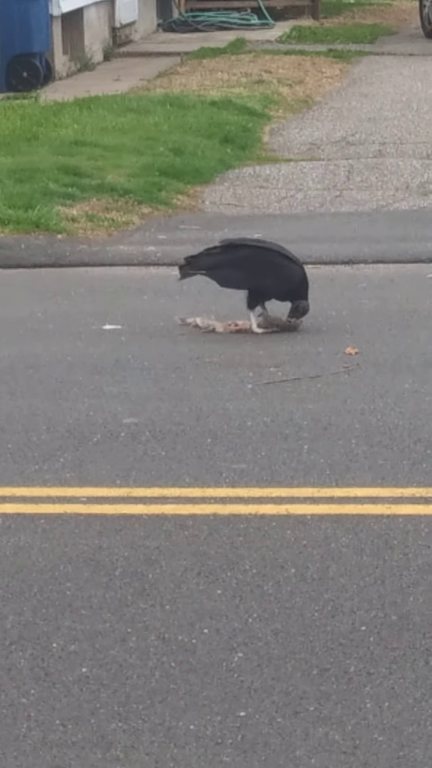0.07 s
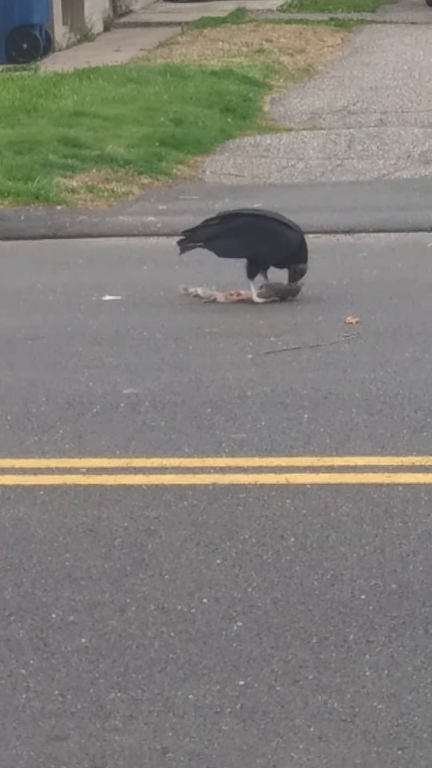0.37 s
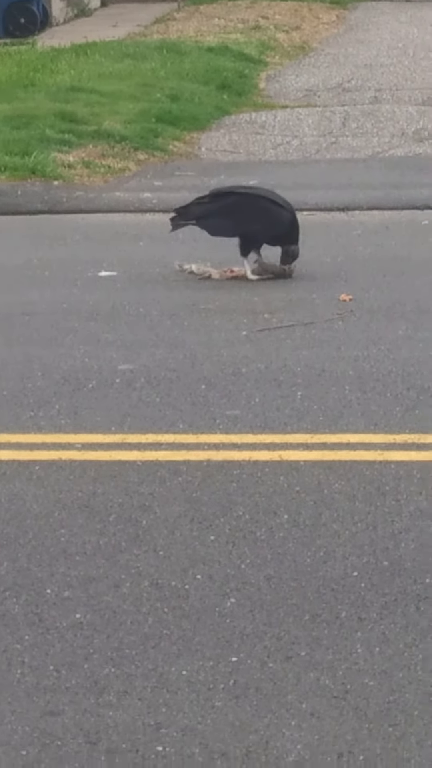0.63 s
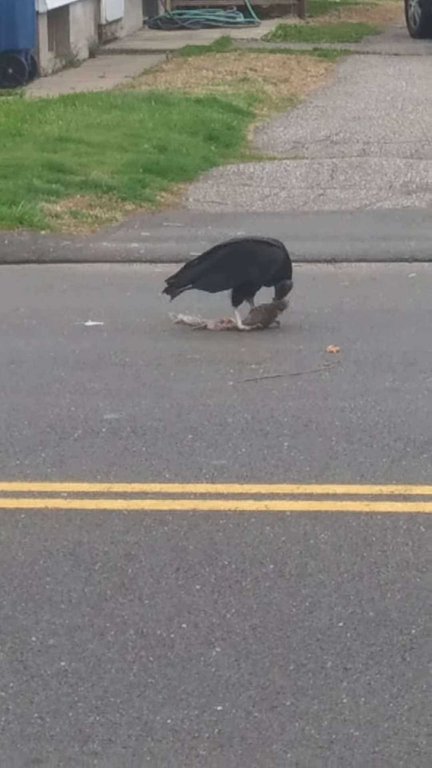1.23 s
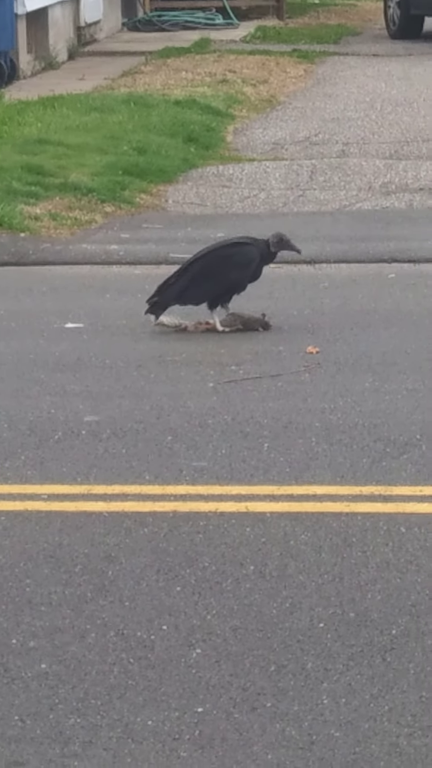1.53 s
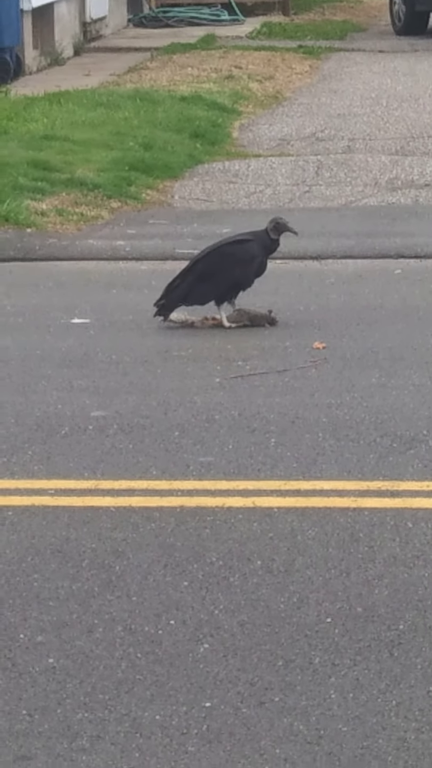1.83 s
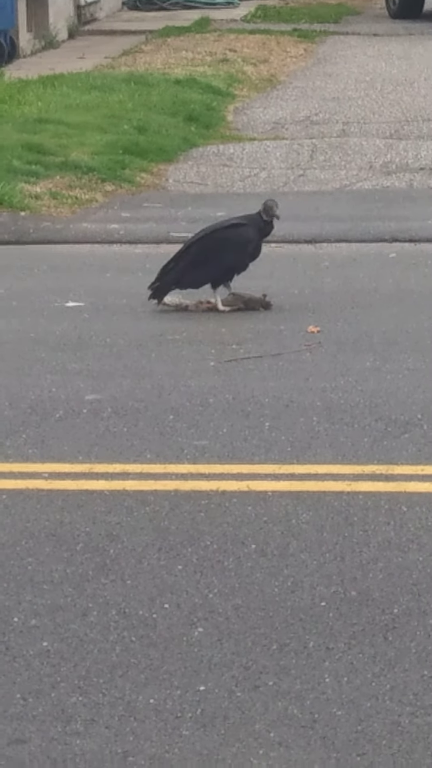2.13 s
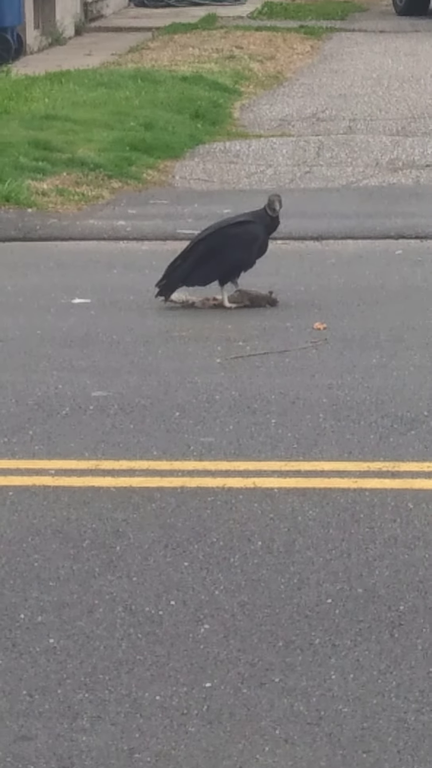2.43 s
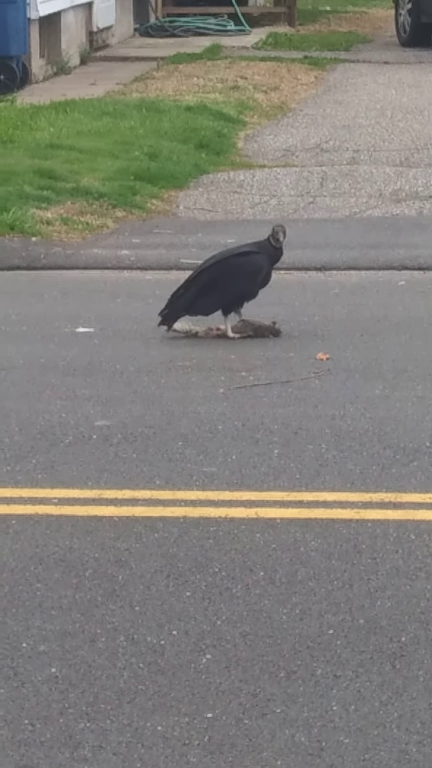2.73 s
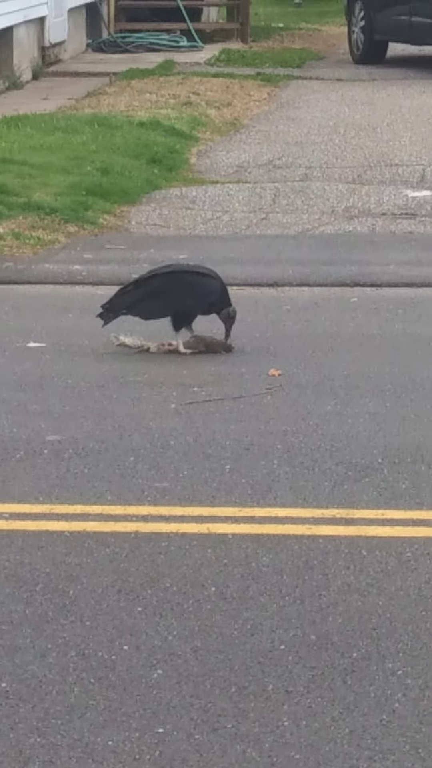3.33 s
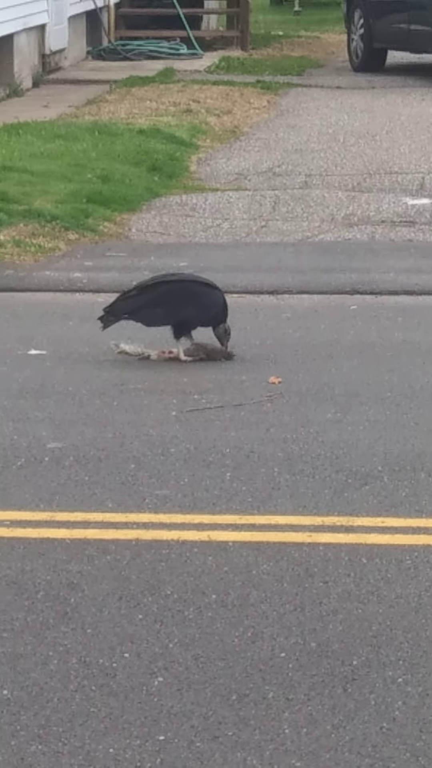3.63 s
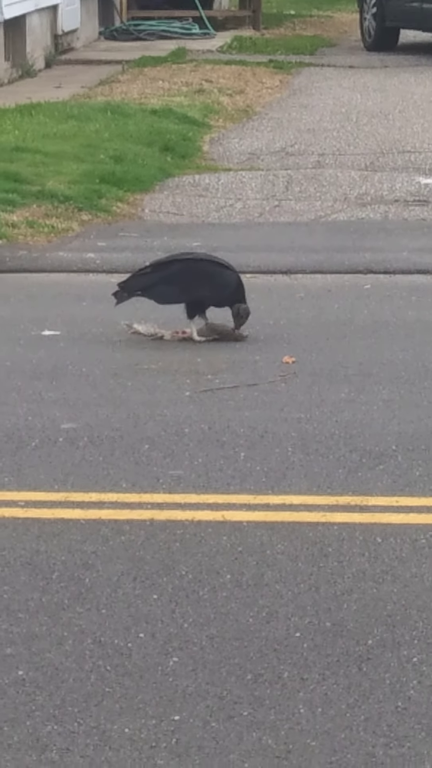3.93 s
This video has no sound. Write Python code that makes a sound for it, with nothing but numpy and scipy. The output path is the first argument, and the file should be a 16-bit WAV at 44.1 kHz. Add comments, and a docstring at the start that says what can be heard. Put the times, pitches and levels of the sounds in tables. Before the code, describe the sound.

Tyre noise from a far-off car gradually builds along a quiet suburban road. Faint birds whistle, chatter and rasp. Up close come one hollow clack early on, light dry ticks and soft finger bumps on the camera.

```python
"""The tyre noise of a far car slowly swells over a low rumble on a quiet suburban street.
Up close, fingers bump and creak on a hand-held camera's case, with faint dry ticks, and something hard
clacks once, its quick contacts ringing a hollow body. Small birds whistle, chatter and rasp far away.
Underneath lie a soft hiss and a very faint, blipping high whine."""
import sys
import numpy as np
from scipy import signal
from scipy.fft import rfft, irfft, next_fast_len
from scipy.io import wavfile
from scipy.ndimage import uniform_filter1d, map_coordinates

SR = 44100
rng = np.random.default_rng(int(sys.argv[2]) if len(sys.argv) > 2 else 0)


def file_out(sig):
    """Save sig as 16-bit WAV at sys.argv[1]."""
    # one column per channel
    cols = np.atleast_2d(sig).T
    # limit, then scale
    lim = np.clip(cols, -1, 1)
    pcm = np.round(lim * 32767).astype(np.int16)
    wavfile.write(sys.argv[1], SR, pcm)


N = 176400

# Table levels are relative; a colour is an EQ curve for noise.
# colour of the hiss bed: f/Hz, level/dB
HISS_COLOUR = [(25, -8), (1000, 11), (4000, 1), (6000, 3), (8000, 0.5), (10000, 2.5), (12000, -1),
               (15500, 1.5)]
# falling bird notes: t/s, length/s, start f/Hz, end f/Hz, level/dB
WHISTLE_NOTES = [(0.01, 0.07, 3990, 3960, -68.5), (0.405, 0.16, 5000, 4390, -66),
                 (.597, 0.12, 4740, 4450, -65.5), (1.485, 0.12, 5180, 4350, -62),
                 (1.655, 0.097, 5400, 4650, -65), (2.63, 0.055, 4330, 4130, -61),
                 (3.18, 0.112, 4430, 4330, -59)]
# colour of a bird's rattling chatter: f/Hz, level/dB
RATTLE_COLOUR = [(3000, -42), (3900, -4), (4500, 0), (4900, -2), (5500, -16), (6500, -48)]
# a bird's harsh calls: t/s, length/s, level/dB
RASP_CALLS = [(1.005, .21, -54.5), (1.315, .04, -60)]
# colour of the breath in those calls: f/Hz, level/dB
BREATH_COLOUR = [(2300, -32), (3100, -4), (3550, 1), (3850, -2), (4500, -10), (5800, -20), (6500, -24),
                 (7100, -15), (7500, -28), (8100, -21), (9500, -45)]
# patches of finger creak: centre t/s, half length/s, level/dB
CREAK_PATCHES = [(0.174, 0.084, -81), (0.78, 0.053, -65), (2.29, 0.091, -66), (2.97, 0.14, -74),
                 (3.235, 0.081, -61), (3.887, 0.041, -66)]
# colour of the friction grains: f/Hz, level/dB
CREAK_COLOUR = [(2000, -28), (4400, 11), (6000, 5), (9500, -4), (12000, -4), (15500, -25)]
# dry ticks: t/s, level/dB, centre f/Hz
TICK_HITS = [(.0912, -48, 9500), (.2384, -46.5, 5200), (.5312, -47.5, 10500), (.566, -36.5, 3400),
             (.603, -52, 7500), (.803, -55, 5460), (1.102, -35, 2900), (1.3843, -47, 10000),
             (1.764, -52.5, 7500), (1.9864, -43.5, 5800), (2.0692, -43.5, 7900), (2.1565, -49, 9000),
             (2.2488, -48, 6500), (2.2677, -51, 6000), (2.2812, -41, 5600), (2.86, -50, 7000),
             (2.996, -47, 8000), (3.2076, -41, 6500), (3.243, -46, 8450), (3.3692, -47, 7500),
             (3.3862, -40, 7950), (3.449, -50, 9000), (3.5808, -46, 8950), (3.66, -47.5, 7000),
             (3.7908, -49, 7000), (3.925, -45.5, 8500), (3.9804, -48, 7000)]
# finger bumps on the case: t/s, level/dB, f/Hz
FINGER_HITS = [(.125, -44, 190), (0.227, -41.5, 287), (0.239, -33.5, 337), (.253, -45, 249),
               (0.27, -42.5, 222), (0.299, -45, 200), (0.94, -40.5, 290), (1.282, -39, 293),
               (1.308, -47, 277), (1.433, -49, 260), (1.450, -45.5, 280), (1.489, -46, 250),
               (1.983, -36.5, 318), (1.989, -35.5, 357), (1.997, -37, 268), (2.344, -38.5, 262),
               (2.4971, -20.5, 385), (2.513, -32.5, 460), (2.667, -33.5, 292), (2.676, -33.5, 322),
               (2.690, -22, 626), (2.698, -24.5, 322), (2.709, -35, 250), (2.787, -29.5, 305),
               (2.562, -38.5, 194), (2.870, -35.5, 285), (2.902, -40, 260), (3.076, -40, 323),
               (3.302, -48, 198), (3.474, -29.5, 313), (3.659, -32, 290), (3.742, -31.5, 330),
               (3.755, -28.5, 328), (3.856, -27.5, 373), (3.87, -29.5, 387), (3.898, -29, 290)]
# contacts within the clack: t/s, level/dB
CLACK_HITS = [(0.8911, -20), (0.8934, -19.5), (0.8944, -19.5), (0.8997, -24.5), (0.9066, -34)]
# the clack's hollow low body and hard ring: f/Hz, level/dB, t60/s
CLACK_RING = [(297, -16, 0.045), (397, -8, 0.053), (448, -5, 0.055), (1535, -5, 0.095), (1617, 0, 0.047),
              (1870, -5, 0.04), (2070, 2, 0.021), (2200, 4, 0.016), (2340, -4, 0.037), (2990, -15, 0.024),
              (3380, -9.5, 0.018), (3580, -16, 0.04)]
# band-pass on the clack: low f/Hz, high f/Hz
CLACK_EDGES = [250, 3660]
# colour of the low rumble: f/Hz, level/dB
RUMBLE_COLOUR = [(25, -36), (70, -31), (100, -16), (150, -5.5), (210, -1.5), (290, 1.5), (470, 5),
                 (560, -5.5), (900, -12), (2000, -41.5)]
# fader ride of the rumble: t/s, level/dB
RUMBLE_RIDE = [(0, -58.5), (.6, -59.5), (1.9, -59.5), (2.4, -55), (2.9, -52.5), (4, -49.5)]
# colour of the tyres far off: f/Hz, level/dB
FAR_COLOUR = [(150, -48), (400, -19.5), (560, -14), (730, -9.5), (950, -5), (1230, -4), (1360, 0),
              (1600, -2.5), (1850, -4), (2180, -1.5), (2420, -13.5), (2800, -23), (3200, -26), (4000, -31),
              (4700, -32), (6000, -50), (12000, -65)]
# colour of the tyres nearer by: f/Hz, level/dB
NEAR_COLOUR = [(150, -53), (400, -22), (560, -16.5), (730, -9), (950, -5.5), (1230, -4), (1400, 1),
               (1600, -1), (1850, -1), (2180, -0.5), (2420, -16.5), (2780, -24.5), (3130, -32), (3350, -27),
               (3600, -30.5), (4100, -23.5), (4500, -27.5), (4900, -34), (5450, -36), (5900, -43.5),
               (12000, -68)]
# fader ride of the tyres as the car approaches: t/s, level/dB
TYRE_RIDE = [(0.0, -41.5), (0.66, -41), (0.95, -39), (1.56, -39.5), (2.98, -33), (3.62, -33), (3.98, -30.5)]


def amp(db):
    """Decibels to gain."""
    return 10 ** (np.asarray(db) / 20)


def unit(x):
    """Scale to rms 1."""
    return x / np.sqrt(np.mean(x ** 2) + 1e-20)


def clock():
    """Time of every sample."""
    return np.arange(N) / SR


def wobble(rate):
    """A smooth random modulator, rate knots a second."""
    return map_coordinates(rng.standard_normal(400), [np.arange(N) * rate / SR], mode="wrap")


def filtered(x, response):
    """EQ x with a gain given as a function of frequency."""
    size = next_fast_len(N + 8192)
    return irfft(rfft(x, size) * response(np.fft.rfftfreq(size, 1 / SR)), size)[:N]


def coloured(x, colour):
    """x through a colour curve, at rms 1."""
    f, db = np.transpose(colour)
    return unit(filtered(x, lambda hz: amp(np.interp(np.log(hz + 1), np.log(f + 1), db))))


def noise(colour):
    """Coloured noise of rms 1."""
    return coloured(rng.standard_normal(N), colour)


def patchy(x, depth_db):
    """Add texture: small patches of random gain over time and frequency, at rms 1."""
    spectrum = signal.stft(x, nperseg=512)[2]
    field = uniform_filter1d(rng.standard_normal(spectrum.shape), 4, axis=0)
    field = uniform_filter1d(field, 12, axis=1)
    return unit(signal.istft(spectrum * amp(depth_db * unit(field)), nperseg=512)[1][:N])


def butter(x, kind, hz, order):
    """x through a Butterworth filter."""
    return signal.sosfilt(signal.butter(order, hz, kind, fs=SR, output="sos"), x)


def add(track, s, sound):
    """Mix a sound in at time s."""
    i = max(0, round(s * SR))
    track[i:i + len(sound)] += sound[:max(0, N - i)]


def street_echo(x, t60):
    """The street's diffuse reverb tail, wet only."""
    t = np.arange(SR // 2) / SR
    tail = rng.standard_normal(len(t)) * amp(-60 * t / t60)
    return signal.fftconvolve(x, tail / np.linalg.norm(tail))[:N]


def hiss(db=-67):
    """A steady, airy noise bed."""
    return amp(db) * noise(HISS_COLOUR)


def whine(hz=14000, db=-74, first_s=0.133, every_s=0.321, blip_s=0.022):
    """A very faint high tone that blips and, for a while, stutters."""
    t = clock()
    blips = (t - first_s) % every_s < blip_s
    stutter = (t > 1.42) & (t < 1.75) & (wobble(60) > -0.5)
    gate = uniform_filter1d((blips | stutter).astype(float), size=128)
    return amp(db) * gate * np.sin(2 * np.pi * hz * t)


def bird_whistles(settle=2.8, fade_db=2.5):
    """Clean notes that fall, level off and fade, with a touch of street reverb."""
    out = np.zeros(N)
    for s, length, start_hz, end_hz, db in WHISTLE_NOTES:
        progress = np.linspace(0, 1, int(length * SR))
        glide_hz = end_hz + (start_hz - end_hz) * np.exp(-settle * progress) * (1 - progress)
        hz = glide_hz * (1 + 0.0038 * wobble(310)[:len(progress)])
        envelope = amp(db - fade_db * progress) * np.sqrt(2 * np.abs(np.sin(np.pi * progress)))
        add(out, s, envelope * np.sin(2 * np.pi * np.cumsum(hz) / SR))
    return out + amp(-9) * street_echo(out, t60=0.31)


def bird_chatter(start_s=0.805, end_s=2.03, notes_per_s=23, slowing_per_s2=5.6):
    """A rattle of uneven, noisy notes that swells, slows and fades."""
    t = clock() - start_s
    progress = np.clip(t / (end_s - start_s), 0, 1)
    swell = np.abs(np.sin(np.pi * progress ** 0.88)) ** 0.47
    notes = 0.5 + 0.5 * np.cos(2 * np.pi * (notes_per_s * t - slowing_per_s2 * t ** 2 / 2))
    return amp(-61 + 1.3 * wobble(20)) * swell * (0.15 + notes) * noise(RATTLE_COLOUR)


def bird_rasps(start_hz=3555, sag_hz_per_s=730, jitter_hz=110):
    """Harsh, breathy calls on a jittery, sagging pitch, trailing off in the street."""
    out, breath = np.zeros(N), amp(-3) * noise(BREATH_COLOUR)
    for s, length, db in RASP_CALLS:
        t = clock() - s
        hz = start_hz - sag_hz_per_s * t + jitter_hz * wobble(700)
        phase = 2 * np.pi * np.cumsum(hz) / SR
        voice = amp(-5.5) * unit(np.sin(phase) + amp(-15.5) * np.sin(2 * phase))
        swell = np.sqrt(np.abs(np.sin(np.pi * np.clip(t / length, 0, 1) ** 0.78)))
        out += amp(db + 1.9 * wobble(60)) * swell * (voice + breath)
    return out + amp(-6) * street_echo(out, t60=0.82)


def finger_creak(grains_per_s=900, grain_s=0.00096, bed_db=-71):
    """Friction on the case: fine grains that rise in patches out of a faint crackle."""
    triggers = rng.random(N) < grains_per_s / SR
    strength = amp(3 * np.minimum(rng.exponential(size=N), 3))
    grains = signal.lfilter([1], [1, -np.exp(-1 / (grain_s * SR))], triggers * strength)
    patches = sum(amp(db) * np.exp(-((clock() - s) / half) ** 2) for s, half, db in CREAK_PATCHES)
    return (amp(bed_db) + patches) * coloured(grains * rng.standard_normal(N), CREAK_COLOUR)


def ticks(t60=0.02, width_octaves=0.52, trim_db=-7.5):
    """Tiny dry snaps of noise, each with its own brightness."""
    out, t = np.zeros(N), np.arange(2048) / SR
    hz = np.fft.rfftfreq(len(t), 1 / SR) + 1
    for s, db, centre_hz in TICK_HITS:
        bell_eq = np.exp(-0.5 * (np.log2(hz / centre_hz) / width_octaves) ** 2)
        burst = irfft(rfft(rng.standard_normal(len(t))) * bell_eq)
        add(out, s, unit(burst) * amp(db + trim_db - 60 * t / t60))
    return out


def finger_bumps(rise_cycles=1.16, t60_cycles=3.3, scuff_t60=0.12, trim_db=-0.5):
    """Each touch thuds for a few cycles, then the skin scuffs; the microphone drops the deep bass."""
    out, t = np.zeros(N), np.arange(SR // 10) / SR
    for s, db, hz in FINGER_HITS:
        cycles = hz * t
        swell = (1 - np.exp(-cycles / rise_cycles)) ** 3 * amp(-60 * cycles / t60_cycles)
        thud = swell / swell.max() * np.sin(2 * np.pi * (cycles + rng.random()))
        rub = butter(rng.standard_normal(len(t)), "band", hz=[0.44 * hz, 1.65 * hz], order=3)
        scuff = unit(rub) * amp(-12.5 - 60 * t / scuff_t60)
        lead_s = t[swell.argmax()] + 1 / (2 * hz)  # the swell peaks half a cycle before its cue
        add(out, s - lead_s, amp(db + trim_db) * (thud + scuff))
    return butter(out, "high", hz=144, order=5)


def clack(attack_s=0.00055, crack_t60=0.007, trim_db=-7.5):
    """A hard object lands in a quick run of contacts, each cracking and ringing the same modes."""
    out, t = np.zeros(N), np.arange(SR // 8) / SR
    ring = sum(amp(db - 60 * t / t60) * np.sin(2 * np.pi * hz * t) for hz, db, t60 in CLACK_RING)
    attack = 1 - np.exp(-t / attack_s)
    for s, db in CLACK_HITS:
        burst = butter(rng.standard_normal(len(t)), "band", hz=[1200, 2600], order=4)
        crack = unit(burst) * amp(-18 - 60 * t / crack_t60)
        add(out, s, amp(db + trim_db) * (ring + crack) * attack)
    return butter(out, "band", hz=CLACK_EDGES, order=6)


def rumble():
    """The traffic's low end wavers gently and builds later than the tyres."""
    level_db = np.interp(clock(), *np.transpose(RUMBLE_RIDE)) + 0.94 * wobble(21)
    return amp(level_db) * noise(RUMBLE_COLOUR)


def tyres():
    """Tyre wash swells as the car approaches, crossfading from its far colour to its near one."""
    level_db = np.interp(clock(), *np.transpose(TYRE_RIDE))
    nearness = np.clip((level_db - level_db.min()) / np.ptp(level_db) * 1.47, 0, 1)
    wash = np.sqrt(1 - nearness) * noise(FAR_COLOUR) + np.sqrt(nearness) * noise(NEAR_COLOUR)
    return patchy(wash, depth_db=0.94) * amp(level_db + 0.091 * wobble(12))


def scene():
    """Mono mix of the birds, the traffic, the noise bed and the close-up handling."""
    birds = bird_whistles() + bird_chatter() + bird_rasps()
    traffic = tyres() + rumble()
    bed = hiss()
    close_up = finger_bumps() + clack() + ticks() + finger_creak()
    return (bed + whine() + birds + close_up + traffic)[None]


def record(dry, top_hz=15750):
    """The camera's band limit: a brick-wall high cut."""
    return filtered(dry[0], lambda hz: hz < top_hz)[None]


dry = scene()
out = record(dry)
file_out(out)
```